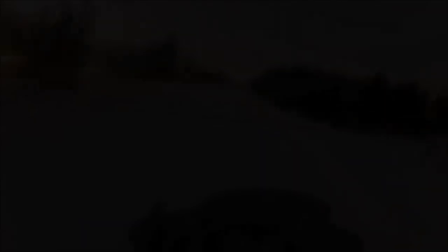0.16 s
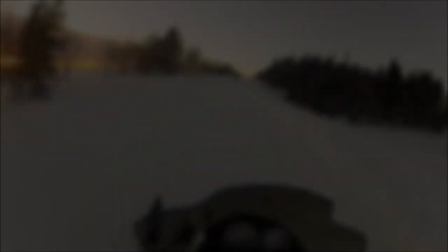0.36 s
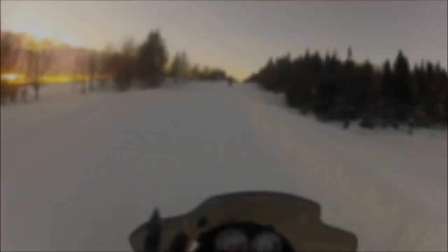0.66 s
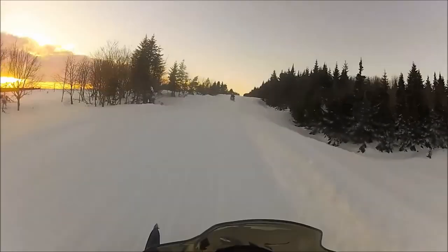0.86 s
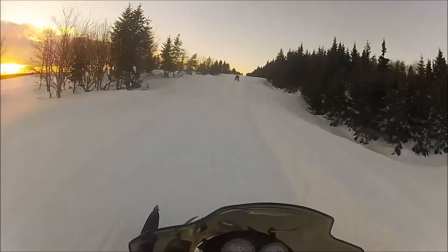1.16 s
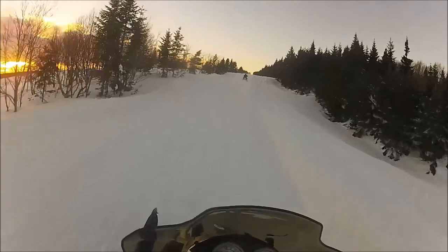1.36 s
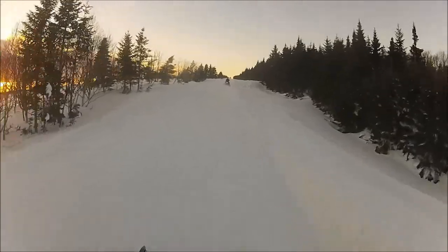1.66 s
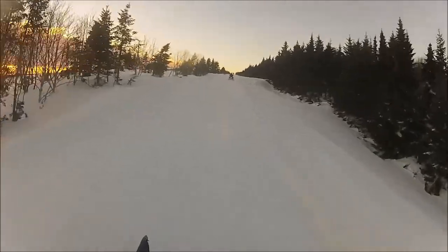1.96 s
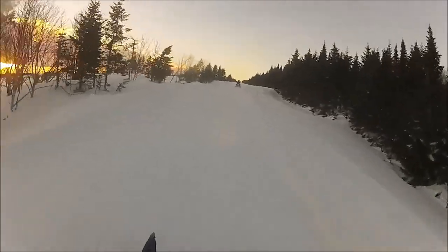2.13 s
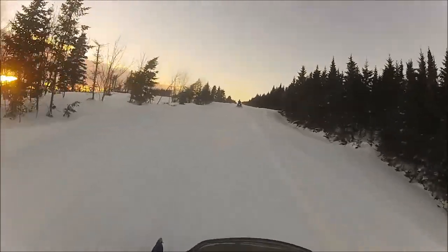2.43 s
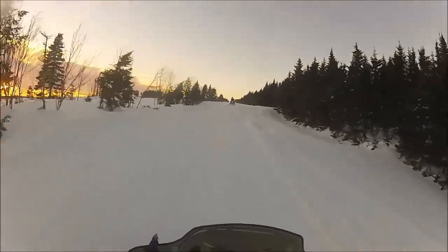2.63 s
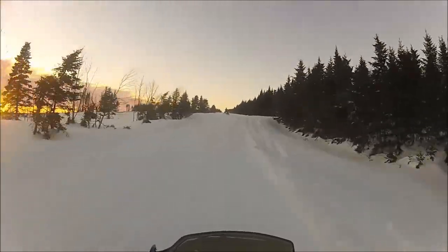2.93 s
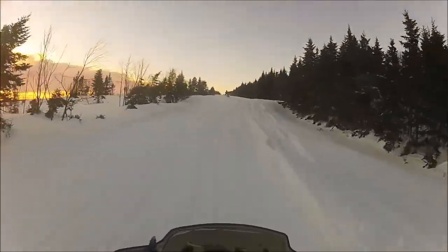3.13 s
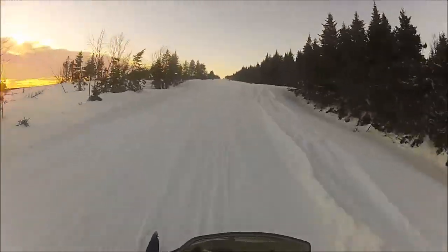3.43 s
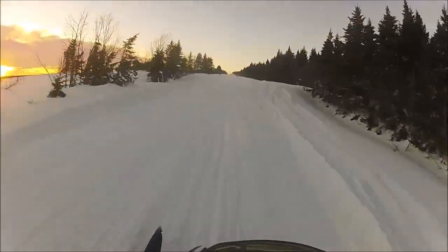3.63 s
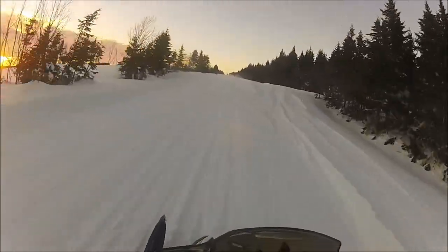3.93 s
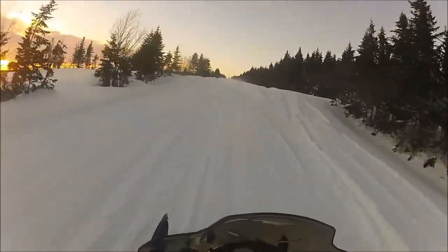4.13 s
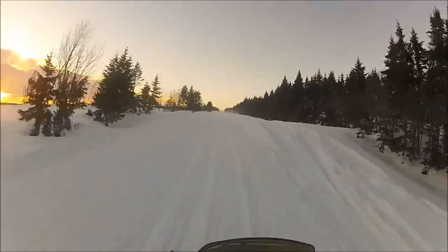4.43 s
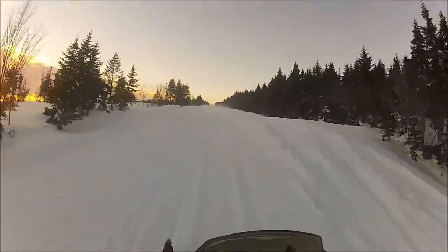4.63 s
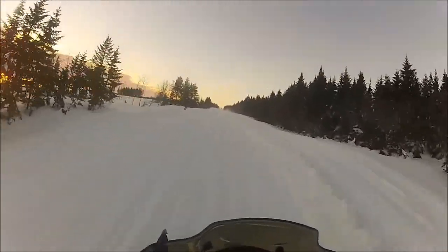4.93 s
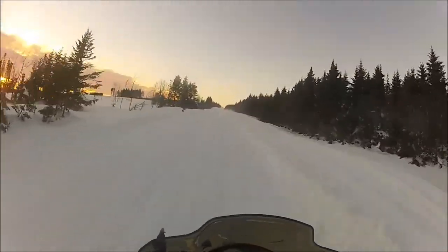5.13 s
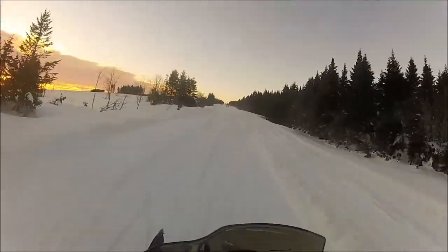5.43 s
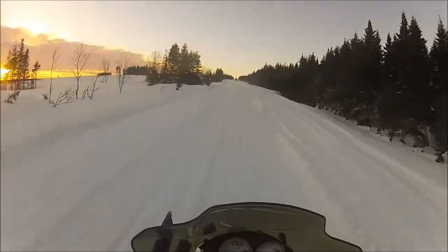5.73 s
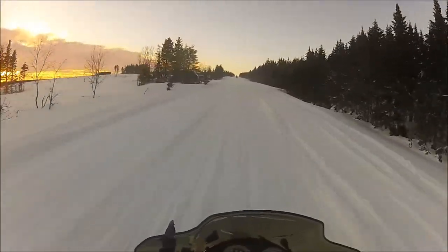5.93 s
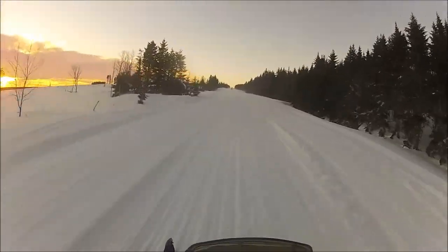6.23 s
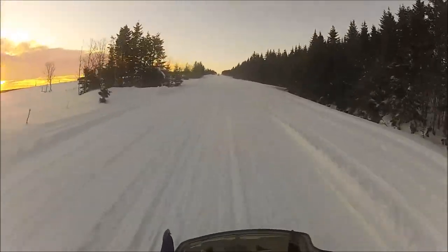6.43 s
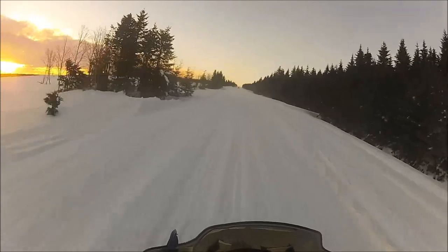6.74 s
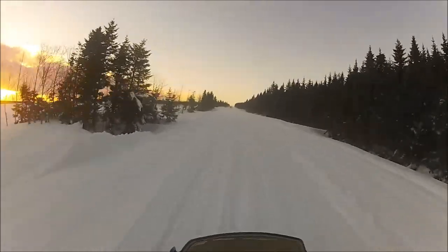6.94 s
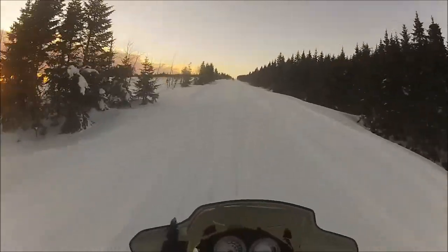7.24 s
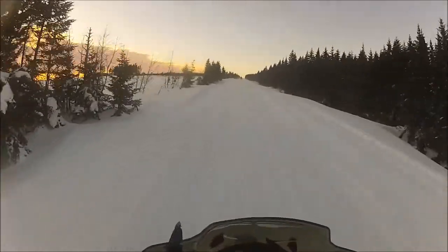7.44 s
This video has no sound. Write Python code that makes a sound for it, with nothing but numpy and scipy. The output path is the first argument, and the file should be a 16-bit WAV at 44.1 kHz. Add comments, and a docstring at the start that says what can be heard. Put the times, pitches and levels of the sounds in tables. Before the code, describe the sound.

From the rider's helmet outdoors, a two-stroke snowmobile engine whines with a nasal, raspy buzz. It surges at once, eases around one second, sags before two, then pulls again in repeated throttle squeezes. Track hum, snow hiss, chassis rumble and buffeting wind continue underneath, with brief faint squeals near two seconds. The small microphone sounds coarse, with fizzy treble.

```python
"""Packed snow trail: a two-stroke snowmobile heard from the rider's helmet, revs surging and easing.
Crank orders sweep through pipe and hood resonances; noise pulsed by the crank adds combustion rasp.
The track hums at lug rate and sprays snow hiss; chassis rumble, wind and brief squeals join in.
Coarse sample-and-hold mirrors the sound into a fizzy treble."""
import sys
import numpy as np
from scipy import signal
from scipy.fft import rfft, irfft, next_fast_len
from scipy.io import wavfile
from scipy.ndimage import uniform_filter1d

SR = 44100
rng = np.random.default_rng(int(sys.argv[2]) if len(sys.argv) > 2 else 0)


def materialize(psi):
    """Save the field psi as 16-bit PCM at rate SR to the path in sys.argv[1].

    A 1-D psi becomes a single channel; in a 2-D psi each row is a channel.
    """
    bounded = np.clip(np.atleast_2d(psi).T, -1, 1)
    quanta = np.round(bounded * 32767).astype(np.int16)
    wavfile.write(sys.argv[1], SR, quanta)


N = 334719

# throttle squeezes: opens t/s, shuts t/s, target revs f/Hz, lag t/s
SQUEEZES = [(0.0, 0.665, 122.2, 0.334), (0.715, 1.147, 119.8, 0.112), (2.083, 3.245, 111.7, 0.449),
            (3.784, 4.379, 114.8, 0.509), (4.574, 5.305, 117.6, 0.554), (5.305, 6.038, 114.45, 0.037),
            (6.423, 7.103, 120.6, 0.611), (7.134, 7.7, 115.3, 0.274)]
# pipe and hood resonances: centre f/Hz, width f/Hz, relative level/dB
HOOD_MODES = [(332, 66, -10), (496, 77, -7), (840, 50, -8), (1066, 88, -13), (1300, 36, -1), (1402, 70, 0),
              (1793, 37, -1), (1894, 48, 1), (2056, 52, 2), (2386, 160, -5), (2900, 300, -15)]
# pipe favouring crank orders: order, relative level/dB
PIPE_ORDERS = [(3, 0), (4, -6), (5, -2), (6, -0.5), (7, 0.5), (8, 4.5), (9, 1.5), (10, 2.5), (11, 2),
               (12, 3), (13, 2.5), (14, 4.5), (15, 0), (16, 1), (17, 0.5), (18, 1.5), (19, -1.5), (24, -5)]
# orders singing out at certain revs: order, revs f/Hz, width in revs f/Hz, boost level/dB
ON_TUNE = [(8, 103.5, 6, 1.5), (9, 118, 2.2, 4), (11, 118, 3.3, 5), (12, 119.4, 5.8, 4),
           (15, 119.5, 1.5, 5.5), (17, 108.8, 5.4, 6.5), (18, 113.5, 4.5, 7)]
# engine layers: level/dB at cruising revs, slope dB per Hz of revs, change level/dB on shut throttle
WHINE_LAYER = (-33.5, .2, -0.86)
FIRING_LAYER = (-37.5, -0.32, -9)
GAS_LAYER = (-25.5, 0.095, 0.11)
# harsh engine flares after throttle cuts: middle t/s, half length t/s, boost level/dB
FLARES = [(1.39, 0.13, 6), (3.39, 0.15, 3.5), (6.2, 0.16, 5)]
# uneven firing heard at order 1: middle t/s, half length t/s, level/dB before engine gain
BURBLE = (1.63, 0.39, -33.5)
# track lugs passing the drive wheel: t/s, lug rate f/Hz, relative hum level/dB
TRACK = [(0.0, 168, -41), (0.95, 250, -38), (1.2, 252, -38), (2.05, 220, -43), (3.3, 254, -38),
         (3.9, 249, -34), (4.7, 255, -34), (5.15, 267, -35), (5.9, 305, -45), (6.65, 296, -34),
         (7.25, 310, -34), (7.59, 327, -38)]
# rough (+) and calm (-) stretches: middle t/s, half length t/s, wind level/dB, snow spray level/dB
STRETCHES = [(1.3, 0.21, 9.5, -0.5), (1.466, 0.27, 5.5, 5.5), (2.22, 0.58, -13, 0.5), (2.8, 0.24, 1, -0.5),
             (3.244, 0.13, -5, 1.5), (3.618, 0.22, 5, 2.5), (4.547, 0.13, 4.5, 2.5), (5.674, 0.56, 6, 2.5),
             (6.605, .5, 1.5, -0.5), (7.456, 0.21, 4, 3)]
# squeals as of belt or runners: middle t/s, half length t/s, f/Hz, peak level/dB
SQUEALS = [(1.52, 0.076, 3385, -30), (2.072, 0.058, 1890, -24.5), (2.193, 0.095, 3430, -33),
           (2.196, 0.11, 5170, -39), (2.352, 0.056, 2660, -29.5)]
# noise spectra: f/Hz, relative density level/dB
RASP_SPECTRUM = [(400, -14.5), (680, -19.5), (830, -7.5), (960, -13.5), (1170, -7), (1270, 1.5),
                 (1400, 2.5), (1570, -2), (1900, 2), (2300, -5.5), (2750, -5), (3000, -11.5), (5500, -22.5)]
SNOW_SPECTRUM = [(500, -13), (1500, -3), (2600, 4.5), (2950, 0.5), (3200, 2.5), (3580, 0.5), (3800, -10),
                 (4150, -4.5), (4450, -13), (4900, -6), (5230, -3), (5520, -8.5), (5780, -28)]
RUMBLE_SPECTRUM = [(50, -14), (95, -3), (135, 0), (215, -1), (310, -3), (400, -13), (540, -13), (680, -21),
                   (1200, -35)]
WIND_SPECTRUM = [(15, -12), (28, -8), (42, 5.5), (70, 3.5), (100, -7.5), (200, -14.5), (500, -50)]

START_REVS_HZ, COAST_REVS_HZ, CRUISE_REVS_HZ = 106.9, 76.3, 110
COAST_LAG_S, THROTTLE_SMOOTHING_S = .5, .15
CRUISE_LUGS_HZ = 250
# ride layers: level/dB at cruising speed, dB per doubling of speed
AIRFLOW, CHASSIS, SPRAY = (-32, 12), (-34, 5.8), (-32, 20.7)
RASP_DB_PER_DOUBLING, TONE_DB_PER_DOUBLING = 5, -1
# share of a stretch's spray dB in the rasp, of its wind dB in the rumble
RASP_SHARE, RUMBLE_SHARE = 0.2, 0.18
SAMPLER_HZ, HOLD_COUNT = 12000, 4
BAND_LIMIT_HZ, CUTOFF_HZ = 5560, 15350
DRIFT_STEP = 40  # samples per drift point


def from_db(db):
    """Decibels to amplitude gain."""
    return 10 ** (np.asarray(db) / 20)


def rms_one(x):
    """Scale to unit rms."""
    return x / np.sqrt(np.mean(x ** 2) + 1e-20)


def in_time(rows):
    """Interpolate each column at every sample."""
    s, *columns = np.transpose(rows)
    return [np.interp(np.arange(N) / SR, s, column) for column in columns]


def swell(middle_s, half_length_s):
    """Smooth rise to 1 and fall back to 0."""
    offset = (np.arange(N) / SR - middle_s) / half_length_s
    return np.cos(np.pi / 2 * np.clip(offset, -1, 1)) ** 2


def drift(rate_hz):
    """Random wander of unit rms: white noise through two equal low-pass poles at rate_hz."""
    pole = np.exp(-2 * np.pi * rate_hz * DRIFT_STEP / SR)
    noise = rng.standard_normal(N // DRIFT_STEP + 2002)
    slow = signal.lfilter([1], [1, -2 * pole, pole * pole], noise)[2000:]  # drop the onset
    return np.interp(np.arange(N) / DRIFT_STEP, np.arange(len(slow)), rms_one(slow))


def coloured(x, spectrum):
    """Shape x by a spectrum over log frequency; unit rms."""
    size = next_fast_len(N)
    hz, db = np.transpose(spectrum)
    bins_hz = np.maximum(np.arange(size // 2 + 1) * SR / size, 1)
    gain = from_db(np.interp(np.log(bins_hz), np.log(hz), db, left=-80, right=-80))
    return rms_one(irfft(rfft(x, size) * gain, size)[:N])


def drive():
    """Revs lag towards each squeeze's target, then coast down; returns revs/Hz and shut (0-1)."""
    t = np.arange(N) / SR
    revs, shut = np.full(N, START_REVS_HZ), np.ones(N)
    for opens_s, shuts_s, target_hz, lag_s in SQUEEZES:
        shut[(t >= opens_s) & (t < shuts_s)] = 0
        phases = (opens_s, target_hz, lag_s), (shuts_s, COAST_REVS_HZ, COAST_LAG_S)
        for start_s, goal_hz, phase_lag_s in phases:
            i = min(int(start_s * SR), N - 1)
            revs[i:] = goal_hz + (revs[i] - goal_hz) * np.exp(-t[:N - i] / phase_lag_s)
    return uniform_filter1d(np.array([revs, shut]), int(THROTTLE_SMOOTHING_S * SR), mode="nearest")


def engine_gain(layer, speed, shut):
    """Engine layer gain from revs and throttle."""
    db, per_rev_db, shut_db = layer
    return from_db(db + per_rev_db * (speed - CRUISE_REVS_HZ) + shut_db * shut)


def ride_gain(layer, pace, extra_db):
    """Ride layer gain from ground speed; pace in doublings of cruising speed."""
    db, per_doubling_db = layer
    return from_db(db + per_doubling_db * pace + extra_db)


def hood_gain(hz):
    """Pipe and hood radiation: resonance powers added."""
    grid_hz = np.linspace(0, SR / 8, 2048)
    power = 0
    for centre_hz, width_hz, db in HOOD_MODES:
        power = power + from_db(2 * db) / (1 + ((grid_hz - centre_hz) / width_hz) ** 2) ** 2
    return np.interp(hz, grid_hz, np.sqrt(power))


def crank_order(k, angle, shut, pulling_rough=0.093, coasting_rough=0.39, waver_db=0.87, flutter_hz=50):
    """Sine at k times crank angle; phase and strength flutter more when firing is uneven off throttle."""
    rough = pulling_rough + coasting_rough * shut
    tone = np.sin(k * angle + rng.uniform(0, 2 * np.pi) + rough * drift(flutter_hz))
    flutter = 1 + rough * drift(flutter_hz)
    return rms_one(tone * flutter * from_db(waver_db * drift(4.5)))


def order_strength(k, speed, shut, shut_pipe_db=-11):
    """Orders swell on crossing a resonance or coming on tune; low pipe notes fade off throttle."""
    db = np.interp(k, *np.transpose(PIPE_ORDERS)) + shut_pipe_db * shut * (k <= 10)
    for order, revs_hz, width_hz, boost_db in ON_TUNE:
        if order == k:
            db = db + boost_db * np.exp(-((speed - revs_hz) / width_hz) ** 2)
    return hood_gain(k * speed) * from_db(db)


def engine_tone(speed, angle, shut):
    """Whine of crank orders 3-26 over the firing tone at order 2."""
    whine = sum(order_strength(k, speed, shut) * crank_order(k, angle, shut) for k in range(3, 27))
    firing = crank_order(2, angle, shut)
    return engine_gain(WHINE_LAYER, speed, shut) * whine + engine_gain(FIRING_LAYER, speed, shut) * firing


def engine_rasp(angle, shut, shake_db=1.54):
    """Gas noise and piston slap: noise bursts every turn, deeper on an open throttle."""
    depth = .33 - .2 * shut
    bursts = 1 + depth * (np.cos(angle) + .5 * np.cos(2 * angle))
    return coloured(rng.standard_normal(N) * bursts * from_db(shake_db * drift(8.6)), RASP_SPECTRUM)


def track_hum(lugs, lug_angle, hum_db, rough=0.33, octave_db=-7, tunnel_hz=460, tunnel_width_hz=28):
    """Lugs drum unevenly on the drive wheel; their octave sounds near the tunnel resonance."""
    beat = lug_angle + rough * drift(4.6)
    octave = from_db(octave_db) / (1 + ((2 * lugs - tunnel_hz) / tunnel_width_hz) ** 2)
    tone = np.sin(beat) + octave * np.sin(2 * beat)
    return from_db(hum_db + 3.5) * tone * (1 + rough * drift(10.7))


def snow_hiss(angle, lug_angle, grain_db=1.2, shake=0.016, throb=0.067, lugs_per_throb=16):
    """Snow grains spray the tunnel: noise shaken by the engine, thrown in waves by the track."""
    waves = 1 + shake * np.cos(angle) + throb * np.sin(lug_angle / lugs_per_throb)
    return coloured(rng.standard_normal(N) * waves * from_db(grain_db * drift(500)), SNOW_SPECTRUM)


def chassis_rumble(pace, gust_db):
    """Low noise growing with ground speed and rough stretches."""
    gain = ride_gain(CHASSIS, pace, RUMBLE_SHARE * gust_db)
    return gain * coloured(rng.standard_normal(N), RUMBLE_SPECTRUM)


def wind_noise(pace, gust_db, gustiness_db=1.3):
    """Airflow noise growing with ground speed, wavering in gusts."""
    gain = ride_gain(AIRFLOW, pace, gust_db + gustiness_db * drift(8.6))
    return gain * coloured(rng.standard_normal(N), WIND_SPECTRUM)


def squeals(width_share=0.019):
    """Rubbing rings an unsteady tone; its bandwidth grows with pitch."""
    t, out = np.arange(N) / SR, np.zeros(N)
    for middle_s, half_length_s, hz, db in SQUEALS:
        phase = 2 * np.pi * hz * t
        in_phase, quadrature = drift(width_share * hz), drift(width_share * hz)
        tone = in_phase * np.cos(phase) + quadrature * np.sin(phase)
        out += from_db(db) * swell(middle_s, half_length_s) * tone
    return out


def firing_burble(angle, shut):
    """Uneven firing during a coast briefly sounds the crank order."""
    middle_s, half_length_s, db = BURBLE
    return from_db(db) * swell(middle_s, half_length_s) * crank_order(1, angle, shut)


def scene():
    """Sum engine, track, squeals, rumble and wind."""
    revs, shut = drive()
    speed = revs * (1 + 0.0014 * drift(23.3))
    lugs, hum_db = in_time(TRACK)
    pace = np.log2(lugs / CRUISE_LUGS_HZ)
    angle, lug_angle = 2 * np.pi * np.cumsum([speed, lugs], axis=1) / SR
    gust_db, spray_db = sum(np.outer(db, swell(s, half_s)) for s, half_s, *db in STRETCHES)
    flare_db = sum(db * swell(s, half_s) for s, half_s, db in FLARES)

    tone_gain = from_db(TONE_DB_PER_DOUBLING * pace + flare_db)
    tone = tone_gain * (engine_tone(speed, angle, shut) + firing_burble(angle, shut))
    rasp_gain = engine_gain(GAS_LAYER, speed, shut)
    rasp_gain = rasp_gain * from_db(RASP_DB_PER_DOUBLING * pace + RASP_SHARE * spray_db)
    engine = tone + rasp_gain * engine_rasp(angle, shut)

    hiss = ride_gain(SPRAY, pace, spray_db) * snow_hiss(angle, lug_angle)
    track = track_hum(lugs, lug_angle, hum_db) + hiss
    ride = chassis_rumble(pace, gust_db) + wind_noise(pace, gust_db)
    return (engine + track + ride + squeals())[None]


def record(dry):
    """Band-limit, sample coarsely and hold, mirroring about the sampling rate; cut the top."""
    held_hz = HOLD_COUNT * SAMPLER_HZ
    band = signal.sosfilt(signal.butter(30, BAND_LIMIT_HZ, fs=SR, output="sos"), dry)
    coarse = signal.resample_poly(band, held_hz, SR, axis=1)[:, ::HOLD_COUNT]
    steps = np.repeat(coarse, HOLD_COUNT, axis=1)
    held = signal.resample_poly(steps, SR, held_hz, axis=1)[:, :N]
    return signal.sosfilt(signal.ellip(10, .2, 90, CUTOFF_HZ, fs=SR, output="sos"), held)


dry = scene()
out = record(dry)
materialize(out)
```